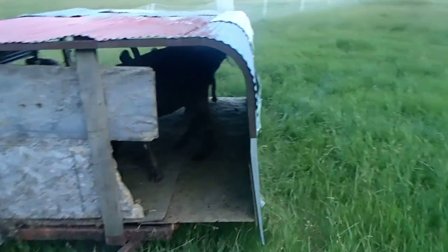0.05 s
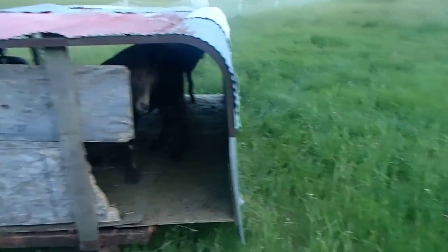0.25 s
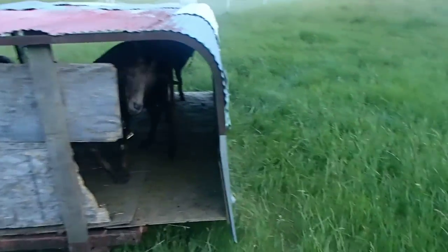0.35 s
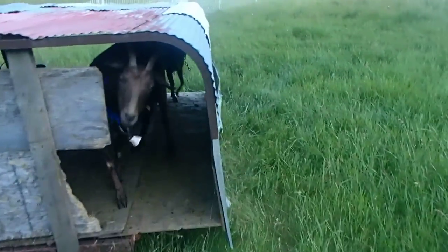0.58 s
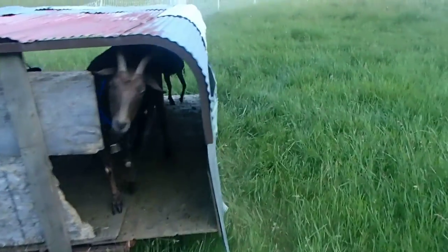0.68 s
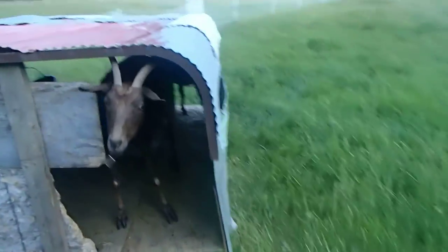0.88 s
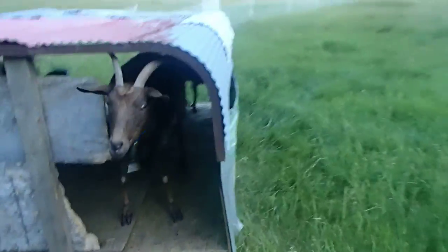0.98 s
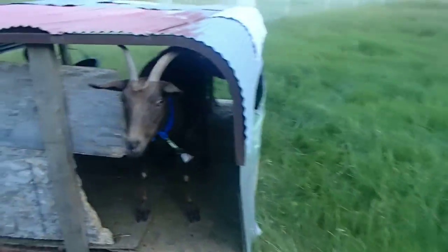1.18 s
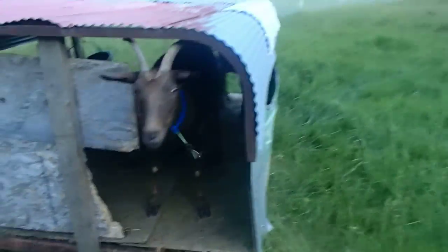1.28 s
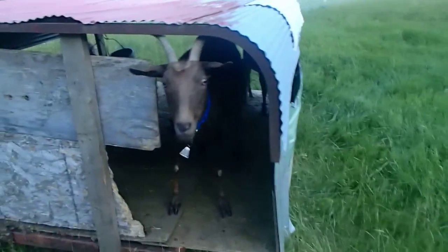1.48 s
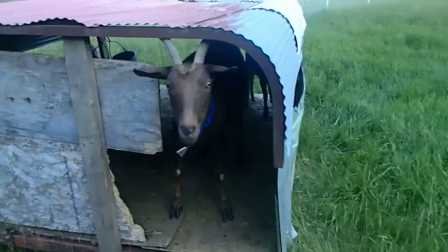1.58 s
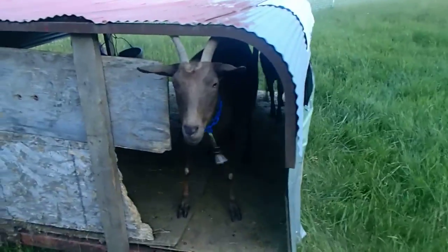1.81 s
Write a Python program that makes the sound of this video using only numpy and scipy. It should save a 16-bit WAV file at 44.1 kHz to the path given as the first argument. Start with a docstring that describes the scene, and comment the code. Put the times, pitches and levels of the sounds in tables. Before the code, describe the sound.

A small sheet-metal goat bell clanks at 0.1, 0.2 and 0.33 s, each strike louder. Hooves knock and scuff floorboards at 0.4 and 0.6 s, hardest at 0.77 s, with crisp straw ticks around it. A soft bell strike follows at 0.88, then four more from 1.26 to 1.55, the last loudest, and another at 1.85. Faint bird chips, steady rustle and rumble; short shelter echo, mono phone sound.

```python
"""A goat in a shelter: a bird chips, a hoof scuffs, then its sheet-metal collar bell rings three times.
Hooves knock and scuff the board floor, hardest near 0.77 s, and bright straw ticks crowd around it.
The bell returns softly, rings four more times from 1.26 s, and is struck again just before the end.
Bell and boards are sums of fading sine waves, the bird is gliding sines, straw and rustle are shaped noise.
The rustle and rumble last throughout; a phone microphone hears it all in mono."""
import sys
import numpy as np
from scipy import signal
from scipy.fft import rfft, irfft
from scipy.io import wavfile
from scipy.ndimage import uniform_filter1d

SR = 44100
rng = np.random.default_rng(int(sys.argv[2]) if len(sys.argv) > 2 else 0)


def transcribe(signal):
    """Save signal, clipped to [-1, 1], as a 16-bit WAV file at the path in sys.argv[1]."""
    frames = np.atleast_2d(signal).T
    limited = np.clip(frames, -1, 1)
    pcm = np.round(limited * 32767).astype(np.int16)
    wavfile.write(sys.argv[1], SR, pcm)


def makeup_ratio(level_db):
    """Linear amplitude ratio for a level in decibels (20 dB per factor of ten)."""
    decades = np.asarray(level_db, float) / 20
    return 10 ** decades


N = 81585
t = np.arange(N) / SR

# Tone colour of the background noise: pitch_hz, level_db (relative)
RUSTLE_COLOUR = [(15, -60.5), (25, -13), (144, -2), (241, 1.5), (371, -3.5), (449, -5.5), (1220, -6.5),
                 (1820, 8.5), (2260, -14), (2590, -15), (2890, -16.5), (3680, -11), (3990, -15),
                 (4950, -14.5), (5980, -7), (9720, -7.5), (15800, -17.5)]
# Rise and fall of the background: time_s, treble_db, middle_db, bass_db
STIR = [(0, 7, 3, 4.5), (.08, 7.5, 1.5, 2.5), (.15, 7.5, -1.5, 4), (.3, 6, 0, 0.14),
        (.45, 6.5, -0.23, 12.5), (.5, 7.5, 1, 5), (.66, 4.5, -3, 6), (.73, -0.5, -2.5, 2),
        (.86, 2, -6.5, 4.5), (.93, 7.5, -0.5, 4.5), (1., 1.5, -9, 4), (1.15, 4, -5.5, 0), (1.3, 0, -4.5, 4),
        (1.5, 5, 0, -0.1), (1.7, 5.5, -7, 0.5), (1.85, 0, -8.5, 0)]
# Borders between bass, middle, treble and very top: pitch_hz
SPLIT_HZ = (1100, 2500, 12500)
RUSTLE_DB = -43.5  # before the rise and fall
GRIT_DB, FLICKER_DB = 1.2, 0.23  # typical size of the chance level changes
TOP_SHARE = 0.09  # how much of the treble's rise and fall the very top follows

# Bird chips: start_s, length_s, from_hz, to_hz, level_db
CHIPS = [(0.017, 0.03, 4584, 6190, -43.5), (0.672, 0.0205, 4215, 4030, -45.5),
         (1.176, 0.0153, 7396, 4690, -44), (1.591, 0.016, 4190, 4290, -38.5),
         (1.734, 0.0084, 7080, 5140, -33.5), (1.824, 0.011, 6940, 4840, -36)]

# Straw ticks: start_s, peak_db (before the band-pass)
TICKS = [(0.3152, -25.5), (0.411, -30.5), (0.7964, -24.5), (0.7943, -22), (0.8025, -26.5), (0.815, -13),
         (0.841, -26.5), (0.9293, -17), (1.0276, -24.5), (1.223, -28.5), (1.7308, -17), (1.7943, -24),
         (1.7983, -23)]
TICK_HZ, TICK_WIDTH_HZ, TICK_S = 8800, 7070, 0.0005
TICK_TAIL_DB, TICK_TAIL_S = -15, 0.003  # tail level is relative to the tick

# Ways the floor boards vibrate: pitch_hz, level_db, t60_s (time to fade by 60 dB)
BOARD = [(119.4, -16.5, 0.0436), (271.65, -12, 0.058), (334.8, -21.5, 0.128), (539.6, -7.5, 0.032),
         (712.2, -4, 0.0223), (813.8, -19.5, 0.081), (1146, -11.5, 0.0228), (1509, -1, 0.0126),
         (1617.7, -2.5, 0.0201), (1885, -15, 0.0447), (3160, -3, 0.00404), (3613, -23, 0.0156),
         (4740, -2.5, 0.0031), (5820, -4, 0.01124)]
# Hoof knocks: start_s, level_db, contact_ms, low_tilt_db_per_octave (positive weakens the lows),
# low_cut_hz, pitch_factor of the plank that is hit
KNOCKS = [(0.0441, -26.5, 0.034, -6.5, 1199, 0.96), (0.4025, -12.5, 0.091, 1, 149, 0.895),
          (0.6082, -19.5, 0.072, 8, 1390, 1.059), (0.617, -24.5, 0.044, 4, 1300, 1.06),
          (0.6217, -25, 0.04, 8.5, 1500, 0.93), (0.6267, -19, 0.053, 13.5, 1024, 1.18),
          (0.6704, -20.5, 0.1666, -1, 750, 1.114), (0.7688, -2, 0.0533, 11.5, 873, 1.01),
          (0.7755, -13.5, 0.09, -9.5, 1014, 0.939), (0.801, -25, 0.324, -2.5, 117, 0.876),
          (0.8134, -21.5, 0.051, 2.5, 980, 1.143), (1.0267, -32.5, 0.067, -5.5, 996, 1.022),
          (1.221, -31.5, 0.048, -5.5, 199, 1.073), (1.2364, -29, 0.147, -6.5, 177.6, 1.117),
          (1.4638, -28.5, 0.167, -7, 143, 0.883), (1.464, -23, 0.063, 8.5, 1700, 1.21),
          (1.7291, -28.5, 0.027, -1, 1370, 1.163)]
# Hoof scuffs and soft treads: start_s, length_s, level_db, brightness_db_per_octave
SCUFFS = [(0.023, 0.148, -38.5, -15), (.35, 0.074, -68, -15.5), (0.436, 0.028, -55.5, -16.5),
          (0.526, 0.1104, -39.5, 0.5), (0.605, 0.0468, -35, 1.5), (0.759, 0.1078, -34.5, -2),
          (0.871, 0.147, -44.5, -10), (1.129, 0.0574, -43.5, 4.5), (1.204, 0.0749, -33.5, -1.5),
          (1.467, 0.0576, -39.5, -5), (0.686, 0.06, -46.5, 8)]
BOARD_PEAK_HZ, LOW_CUT_HZ = 1370, 142
KNOCK_RISE_S, RISE_PER_CONTACT = 0.0001, 3

# Pitches of the bell's partials: pitch_hz
BELL_HZ = [1409, 2579, 3151, 3598, 3799, 4143, 5572, 5722, 6524, 7590, 8299, 8387, 9525, 10792, 11290,
           12820, 12895, 13645, 13938, 15180]
# Loudness of each partial: level_db, then the dB gained per unit of each of four strike-spot coordinates
BELL = [(-5.5, -1.2, 3.9, 3.5, -5), (-22.5, 5, 0, -1.5, 4.15), (-26, -11.5, 4.5, -4.5, 8.5),
        (-15.5, 3.5, 0, -1, -0.83), (-19, 6, 2.66, 2, 1.03), (-22, 3.68, 1, 6, 3),
        (-12.5, 19, 13.5, -6.5, 0.7), (-15.5, -14, 0.5, -7, 1.5), (-4, 7.5, -1.5, 5, -0.22),
        (-18.5, 8.5, 3.6, -9, 5), (-19, -12.5, 5.5, 1.4, -0.5), (-11, 12.5, -2, 0.55, 4),
        (2, -1.41, -1.65, 2.38, -7), (-11, 0.1, -13, -6, 1.15), (-16, -3, 4.5, 6, 0.44),
        (-16.5, 1.5, -4, 4, -3.5), (-19, 1.43, -4.4, 12.5, 7.5), (-21, -7, 1.1, -8.65, -11.5),
        (-20, 3.5, -14.5, 10.5, -3), (-30, 9.5, -1.5, -1.2, -2)]
# Ring time of each partial: t60_s, before the strike's ring-time factor
BELL_T60_S = [0.735, 0.2085, 0.463, 0.226, 0.6365, 0.22, 0.607, 0.145, 0.168, 0.0803, 0.281, 0.199, 0.149,
              0.0786, 0.077, 0.084, 0.087, 0.105, 0.107, 0.132]
# Clapper strikes: start_s, level_db, ring_time_factor
STRIKES = [(0.1076, -31.5, 1.38), (0.2063, -21, 1.108), (0.333, -15.5, 0.876), (0.882, -26.5, 0.955),
           (1.2624, -18, 0.926), (1.3533, -17, 0.944), (1.4494, -21.5, 1.164), (1.553, -13, 1.048),
           (1.8478, -21.5, 0.96)]
# Where each strike lands on the bell: four coordinates (no unit, mostly -1 to 1)
SPOTS = [(-0.347, 0.8, 0.27, 0.9), (-0.197, 1.0, 0.23, -0.408), (-1.305, -0.484, 0.294, -0.399),
         (-0.54, 0.586, -0.996, 0.21), (0.236, -0.346, -0.67, -0.2), (0.26, -0.215, 0.195, 0.042),
         (0.493, -0.19, -0.05, -0.43), (0.102, -0.151, 0.12, 1.0), (0.4, -0.025, 0.54, 0.064)]
# Level of four long-ringing partials as the bell swings and turns: time_s, then level_db of each
SWING = [(.1, -9, 1, 9, -14), (.21, -8, -21.5, -21.5, -7.5), (.25, -1.76, 1.5, -2.5, -7.5),
         (.33, -2, -4.5, 2, -4), (.39, 1.5, 2, 9.5, -1), (.42, 1, 7.5, -0.5, -7.5), (.52, 4, 12, 12.5, -6),
         (.58, -6.5, -6.5, 16, -5), (.88, 5, -6, 4.52, -3.5), (.95, -11, -10.5, 6.5, -25),
         (1.1, -2.5, -14.5, 10.5, -9), (1.26, -4, 4, -15, 6), (1.275, -2, -3, -3, 3),
         (1.3, -6.5, 3, -6.5, 2), (1.33, -1.88, 0.5, 0.5, -2), (1.39, 5.5, 8.5, -0.5, -6.5),
         (1.45, 2, -2, 3.5, -5), (1.55, 1.06, -1, 10, -1), (1.62, 0.7, -4.5, -6.5, 2.5),
         (1.68, -2, -1.5, 0, -1.5), (1.75, -15, -25, 2, 3.5), (1.85, 0, -12, -9.5, 4)]
# Which partials those are, counted from 0: partial_number
SWUNG = [0, 2, 4, 6]
CLACK_S, STOP_S, ATTACK_S = 0.002, 0.001, 0.0006
CLACK_DB, CLACK_LOW_DB = -5.5, 13  # against the strike; low band against the high band
WAVER, SHIMMER_DB = 0.0007, 2.1  # typical chance change of pitch (as a share) and of level

ECHO_DB, ECHO_T60_S = -15, 0.08
TOP_HZ = 15900


def curve(rows, col=1):
    """Join one table column by straight lines in time."""
    return np.interp(t, [row[0] for row in rows], [row[col] for row in rows])


def unit(x):
    """Scale to an rms (average strength) of 1."""
    return x / np.sqrt(np.mean(x ** 2))


def band(x, lo_hz, hi_hz, order=2):
    """Keep only the pitches between two limits."""
    limits = [max(lo_hz, 10), min(hi_hz, SR / 2.2)]
    return signal.sosfilt(signal.butter(order, limits, "bandpass", fs=SR, output="sos"), x)


def walk(rate):
    """Smooth chance wandering around 0 with a spread near 1, built from `rate` random steps a second."""
    k = int(SR / rate)
    steps = np.repeat(rng.standard_normal(N // k + 1), k)
    return 1.3 * uniform_filter1d(uniform_filter1d(steps, k), k)[:N]


def background_rustle():
    """Gritty noise, rustle over field rumble: half-octave bands flicker alone, the very top is steadier."""
    spectrum = rfft(rng.standard_normal(N) * makeup_ratio(GRIT_DB * walk(150)))
    hz = np.maximum(np.fft.rfftfreq(N, 1 / SR), 1)
    colour_hz, colour_db = np.array(RUSTLE_COLOUR).T
    spectrum = spectrum * makeup_ratio(np.interp(np.log(hz), np.log(colour_hz), colour_db))
    treble = curve(STIR, col=1)
    stir = [curve(STIR, col=3), curve(STIR, col=2), treble, TOP_SHARE * treble]  # bass to very top
    out = 0
    for octave in np.arange(4, 14.5, .5):
        # neighbouring bands fade into each other
        share = np.clip(1 - 2 * abs(np.log2(hz) - octave), 0, 1)
        level_db = stir[np.searchsorted(SPLIT_HZ, 2 ** octave)] + FLICKER_DB * walk(16.74)
        out = out + irfft(spectrum * share, N) * makeup_ratio(level_db)
    return out / np.std(irfft(spectrum, N)) * makeup_ratio(RUSTLE_DB)


def bird():
    """Each chip is a short sine wave that glides in pitch while it swells and fades."""
    out = 0
    for start, length, from_hz, to_hz, db in CHIPS:
        u = np.clip((t - start) / length, 0, 1)
        cycles = length * (from_hz * u + (to_hz - from_hz) * u ** 2 / 2)
        out = out + makeup_ratio(db) * np.sin(np.pi * u) * np.sin(2 * np.pi * cycles)
    return out


def straw():
    """Dry bright ticks: noise that dies at once, with a faint longer tail."""
    envelope = 0
    for start, db in TICKS:
        age = np.clip(t - start, 0, 1)
        fade = np.exp(-age / TICK_S) + makeup_ratio(TICK_TAIL_DB) * np.exp(-age / TICK_TAIL_S)
        envelope = envelope + makeup_ratio(db) * fade * (t >= start)
    noise = np.sign(rng.standard_normal(N))  # random +1 and -1
    return band(noise * envelope, TICK_HZ - TICK_WIDTH_HZ / 2, TICK_HZ + TICK_WIDTH_HZ / 2)


def board_rings(age, pitch=1):
    """A struck board vibrates in several ways at once, each a fading sine wave."""
    hz, mode_db, t60 = np.array(BOARD).T[:, :, None]
    return makeup_ratio(mode_db - 60 * age / t60) * np.sin(2 * np.pi * pitch * hz * age)


def knocks():
    """A hoof gives the boards a short push; longer contact dulls the sound and slows its rise."""
    age, hz = t[:SR // 4], np.array(BOARD)[:, 0]
    out = np.zeros(N + len(age))
    for start, db, contact_ms, tilt_db, cut_hz, pitch in KNOCKS:
        contact_s = contact_ms / 1000
        low_octaves = np.log2(np.minimum(hz / BOARD_PEAK_HZ, 1))  # 0 at the peak, negative below
        gain = makeup_ratio(db + tilt_db * low_octaves) * np.exp(-.5 * (2 * np.pi * hz * contact_s) ** 2)
        rise = (1 - np.exp(-age / (KNOCK_RISE_S + RISE_PER_CONTACT * contact_s))) ** 2
        first = int(start * SR)
        out[first:first + len(age)] += band(gain @ board_rings(age, pitch) * rise, cut_hz, 6800, order=4)
    return out[:N]


def scuffs():
    """A sliding or softly treading hoof rubs the boards with grains of uneven strength."""
    grains = rng.standard_normal(N) * makeup_ratio(3.2 * rng.exponential(size=N))
    grit = rfft(signal.fftconvolve(grains, board_rings(t[:SR // 4]).sum(axis=0))[:N])
    hz = np.clip(np.fft.rfftfreq(N, 1 / SR), 200, 2500)  # brightness tilts only in this range
    out = np.zeros(N)
    for start, length, db, tilt_db in SCUFFS:
        u = np.clip((t - start) / length, 0, 1)
        tinted = unit(irfft(grit * makeup_ratio(tilt_db * np.log2(hz / 500)), N))
        out += makeup_ratio(db) * tinted * np.sin(np.pi * u ** 0.669) ** 2
    return out


def hooves():
    """Knocks and scuffs both ring the boards, which pass only a limited range of pitches."""
    return band(knocks() + scuffs(), LOW_CUT_HZ, 7100, order=3)


def bell():
    """Each clapper strike rings all partials by where it lands and stops the ring before it."""
    out = np.zeros(N)
    swing = {k: makeup_ratio(curve(SWING, col=j + 1)) for j, k in enumerate(SWUNG)}
    cycles = [np.cumsum(hz * (1 + WAVER * walk(39.98))) / SR for hz in BELL_HZ]
    # low partials shimmer less
    shimmer = [makeup_ratio(SHIMMER_DB * min(hz / 4000, 1) * walk(45)) for hz in BELL_HZ]
    clack = band(rng.standard_normal(N), 3000, 14000)
    clack += makeup_ratio(CLACK_LOW_DB) * band(rng.standard_normal(N), 1500, 2050, order=4)
    next_starts = [row[0] for row in STRIKES[1:]] + [t[-1] + 1]
    for (start, db, ring), spot, next_start in zip(STRIKES, SPOTS, next_starts):
        end = next_start + STOP_S
        a, b = int(start * SR) + 1, min(int(end * SR), N)
        age = t[a:b] - start
        gate = np.clip((end - t[a:b]) / STOP_S, 0, 1) * np.clip(age / ATTACK_S, 0, 1)
        for k, ((mode_db, *gain), t60) in enumerate(zip(BELL, BELL_T60_S)):
            # every other partial starts upside down
            wave = np.sin(2 * np.pi * (cycles[k][a:b] - cycles[k][a]) + np.pi * (k % 2))
            tone = wave * makeup_ratio(db + mode_db + np.dot(gain, spot) - 60 * age / (t60 * ring))
            out[a:b] += tone * gate * shimmer[k][a:b] * (swing[k][a:b] if k in swing else 1)
        out[a:b] += clack[a:b] * makeup_ratio(db + CLACK_DB) * np.exp(-age / CLACK_S)
    return band(out, 1270, 18000, order=6)


def scene():
    """Add the sources, their short fading-noise echo from the shelter, and the background."""
    near = bell() + hooves() + straw() + bird()
    age = t[:SR // 5]
    echo = rng.standard_normal(len(age)) * makeup_ratio(-60 * age / ECHO_T60_S) * (age > .003)
    echo = echo / np.linalg.norm(echo)
    mono = near + makeup_ratio(ECHO_DB) * signal.fftconvolve(near, echo)[:N] + background_rustle()
    return np.array([mono, mono])


def top_cut(x):
    """Nothing passes above the cut-off."""
    return signal.sosfilt(signal.butter(12, 16260, fs=SR, output="sos"), x)


def record(dry):
    """The phone cuts the highest pitches with a steep low-pass filter."""
    low_pass = signal.ellip(8, .2, 45, TOP_HZ, fs=SR, output="sos")
    mix = signal.sosfilt(low_pass, dry)
    return top_cut(mix)


dry = scene()
out = record(dry)
transcribe(out)
```